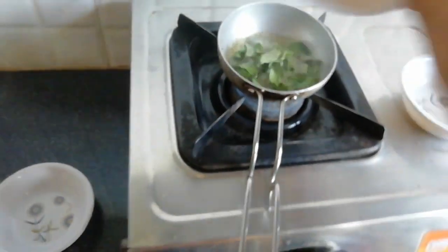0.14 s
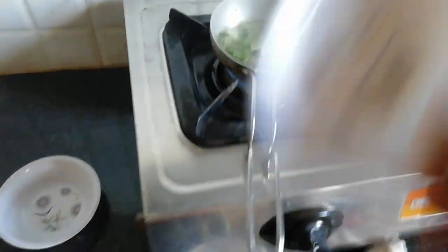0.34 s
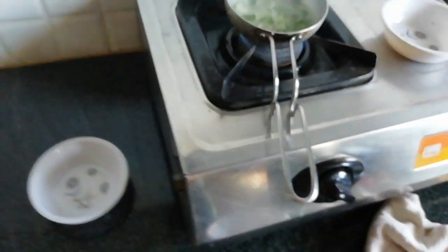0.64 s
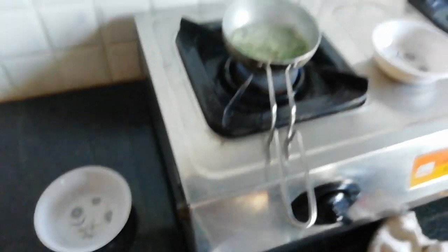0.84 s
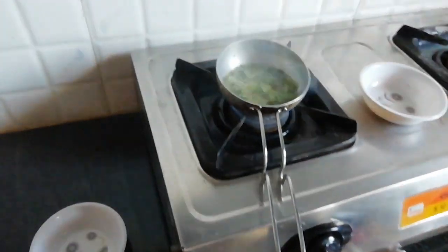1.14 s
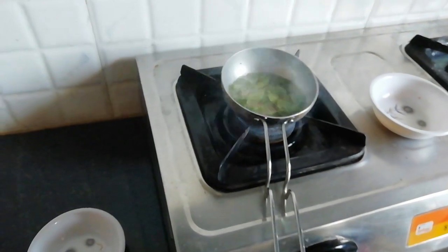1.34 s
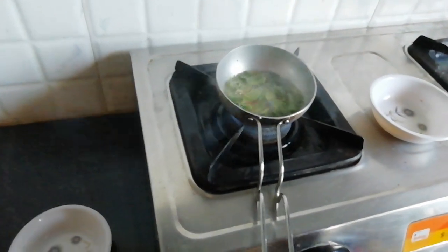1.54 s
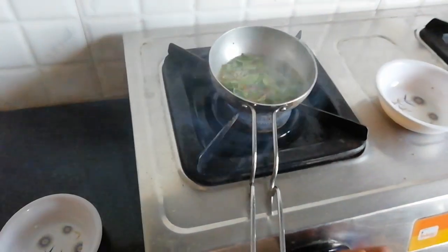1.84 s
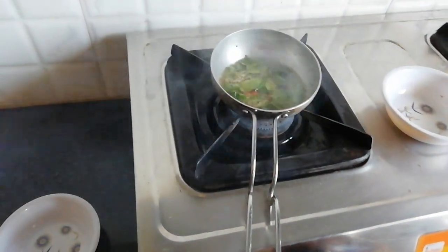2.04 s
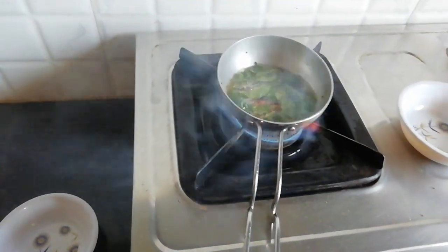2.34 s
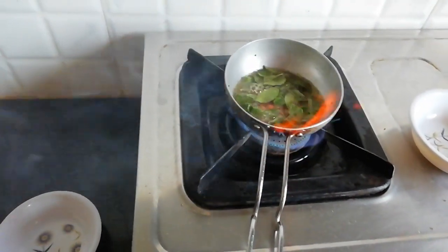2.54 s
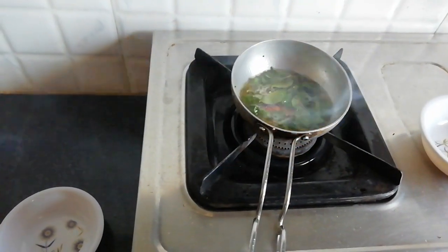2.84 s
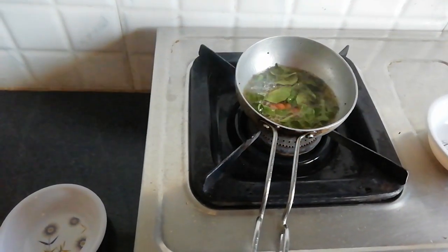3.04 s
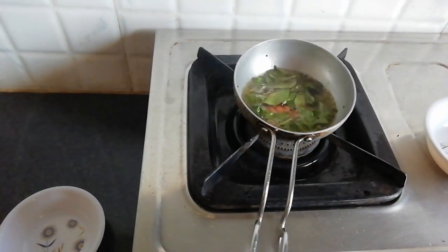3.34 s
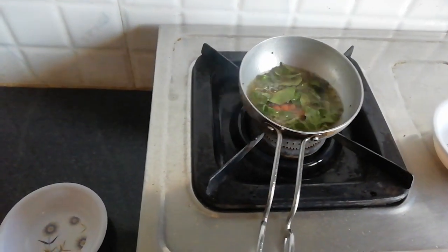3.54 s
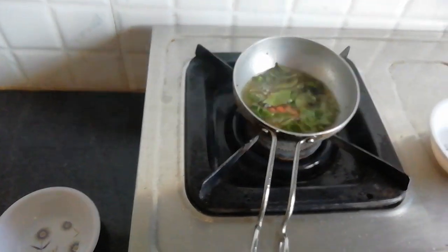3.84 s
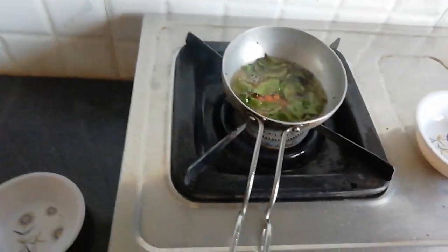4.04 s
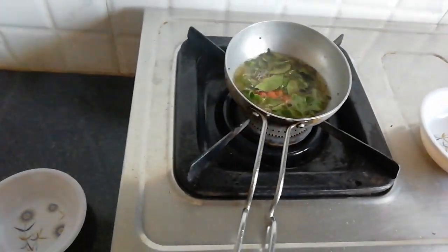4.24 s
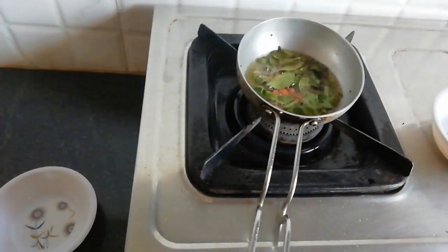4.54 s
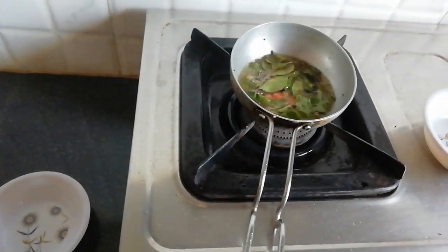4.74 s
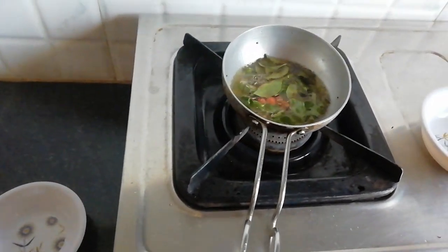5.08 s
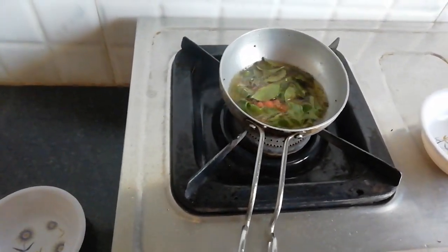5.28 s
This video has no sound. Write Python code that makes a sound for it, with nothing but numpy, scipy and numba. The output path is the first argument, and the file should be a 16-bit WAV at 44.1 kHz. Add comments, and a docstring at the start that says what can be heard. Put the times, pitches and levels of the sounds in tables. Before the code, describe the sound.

A violent rush of frying in a small metal pan, jolted by a thumping pop, gradually dries into sharp single pops and faint hiss.

```python
"""A fierce rush of frying, at once broken by a very loud pop that thumps as it overloads the microphone.
Wet leaves boil in a small steel pan of hot oil: steam bubbles, thousands of short damped sines over hiss,
thin out to single ringing, cracking pops and hollow blurps. Beneath, a gas flame flutters and puffs (shaped noise,
low damped sines) and a distant motor hums (three partials). A phone an arm's length away, its left port facing
the stove, hears it with a short tail from tiled walls."""
import sys
import numpy as np
from scipy import signal
from scipy.fft import rfft, irfft, next_fast_len
from scipy.io import wavfile
from scipy.ndimage import uniform_filter1d, minimum_filter1d
from numba import njit

SR = 44100
rng = np.random.default_rng(int(sys.argv[2]) if len(sys.argv) > 2 else 0)


def store_wav(level_fs):
    """Save 16-bit WAV to argv[1]."""
    pcm = np.round(np.clip(np.atleast_2d(level_fs), -1, 1) * 32767)
    wavfile.write(sys.argv[1], SR, pcm.T.astype(np.int16))


N = 238625


def undb(db):
    """Gain of a level in dB."""
    return 10 ** (np.asarray(db) / 20)


def unit(x):
    """Scaled to rms 1 on the first channel."""
    return x / np.sqrt(np.mean(np.atleast_2d(x)[0] ** 2))


def curves(table):
    """Columns of a table after its time column, one value per sample."""
    s, *columns = np.transpose(table)
    return [np.interp(np.arange(N) / SR, s, c) for c in columns]


def gain_at(hz, points):
    """Gain of a (Hz, dB) table, falling away steeply below its first point."""
    f, db = np.transpose(points)
    low_cut = np.minimum(hz / f[0], 1) ** 2
    return undb(np.interp(np.log(hz + 1), np.log(f), db)) * low_cut


def colour(x, points):
    """Causal (minimum-phase) filter with the gains of a (Hz, dB) table."""
    size = 4096
    ceps = irfft(np.log(gain_at(np.fft.rfftfreq(size, 1 / SR), points) + 1e-4))
    # fold the cepstrum forward in time
    ceps[1:size // 2] *= 2
    ceps[size // 2 + 1:] = 0
    impulse = irfft(np.exp(rfft(ceps)))
    return signal.fftconvolve(x, impulse)[:N]


def walk(rate_hz):
    """Random levels, a new one every 1 / rate_hz s, joined by ramps; spread near 1."""
    hold = int(SR / rate_hz)
    steps = np.repeat(rng.standard_normal(N // hold + 1), hold)
    return uniform_filter1d(steps, hold)[:N]


def split(x, edges_hz):
    """Bands of x between the edges, overlapping softly; they add up to x."""
    size = next_fast_len(x.shape[-1])
    f, spec = np.fft.rfftfreq(size, 1 / SR), rfft(x, size)
    lows = [0 * f] + [1 / (1 + (f / hz) ** 8) for hz in edges_hz] + [1 + 0 * f]
    return [irfft(spec * (b - a), size)[..., :x.shape[-1]] for a, b in zip(lows, lows[1:])]


ALIKE_HZ = 3200  # below this both ports hear the same noise


def noise_pair(count):
    """White noise for two ports: shared bass, unrelated treble."""
    low, high = split(rng.standard_normal((2, count)), [ALIKE_HZ])
    return low[0] + high


@njit
def grains(start, hz, cycles, gain, turn, rise, count):
    """Damped sines with own phases; swell and decay constants are `rise` and `cycles`, in cycles."""
    out = np.zeros(count + 4096)
    for g in range(len(start)):
        z = gain[g] * np.exp(1j * turn[g])
        unswollen = 1.
        p = np.exp((2j * np.pi - 1 / cycles[g]) * hz[g] / SR)
        q = np.exp(-hz[g] / SR / rise)
        for i in range(min(int(7 * cycles[g] * SR / hz[g]) + 1, 4000)):
            unswollen *= q
            out[start[g] + i] += z.real * (1 - unswollen)
            z *= p
    return out[:count]


def bursts(s, hz, cycles, gain, rise, spread_s):
    """Bubbles at both ports; each spot in the pan has its own path to the right port."""
    lag, turn = rng.standard_normal((len(s), 2)).T
    at = np.array([s, s + .00003 + spread_s * lag]).clip(0, (N - 1) / SR)
    cycles = cycles + 0 * hz
    return np.array([grains((a * SR).astype(int), hz, cycles, gain, 3 * turn, rise, N) for a in at])


# Share of the bubble sizes. Each row: time in s, gain of big bubbles, of middle bubbles, of fine spray, all in dB.
SIZES_DB = [(0, -5, -14, -4.5), (.1, -1.5, 3, 6.5), (.4, 0, -1.5, -5), (1.3, 2, 0.5, -2.5),
            (2.3, -0.5, 1, 0), (2.8, -4.5, 2, -9), (4.0, -1, -2.5, -10.5), (4.6, 0, -4, -6.5),
            (5.1, 7.5, 8.5, -8), (5.41, 4, -1, -6)]


def sizzle(hot_rate_hz=6000, cool_rate_hz=900, scatter_db=2.5, surge_db=1.0, steam_db=-8):
    """Dense random bubbles of all sizes over steam hiss; fewer and more uneven as the leaves dry out."""
    big_db, middle_db, fine_db = curves(SIZES_DB)
    dryness = np.linspace(0, 1, N)
    rate_hz = (hot_rate_hz * (cool_rate_hz / hot_rate_hz) ** dryness).clip(100, 20000)
    at = np.flatnonzero(rng.random(N) < rate_hz / SR)
    hz = rng.uniform(448, 16800, len(at))
    scatter = undb(scatter_db * rng.exponential(1, len(at)).clip(0, 4))
    size = scatter * np.sqrt(hz / rate_hz[at])
    bubbles = unit(bursts(at / SR, hz, 0.9, size, 0.15, .00008))
    steam = undb(steam_db - 1.4 * dryness) * noise_pair(N)
    bands = split(bubbles + steam, [2000, 3800, 8000])
    # surges, as pockets of water reach the oil, move all sizes; each size also flutters alone
    surge = surge_db * (1 + 0.23 * dryness) * walk(40) + 0.6 * walk(150)
    levels_db = (big_db, middle_db, 0, fine_db)
    return sum(b * undb(db + surge + 1.52 * walk(29.866)) for b, db in zip(bands, levels_db))


# Level of the sizzle, including the phone's gain dipping after the loud thump.
# Each row: time in s, gain in dB on the sizzle scaled to an overall rms of 1 at the left port.
SIZZLE_LEVEL_DB = [(0, -9), (.05, -17.5), (.07, -24.5), (.14, -19.5), (.3, -14.5), (.7, -14), (1.0, -16),
                   (1.2, -13.5), (1.5, -17.5), (1.7, -15), (2.1, -17.5), (2.4, -17.5), (2.8, -20.5),
                   (3.3, -25), (3.7, -30.5), (4.05, -29), (4.25, -37.5), (4.5, -32), (4.83, -39.5),
                   (4.98, -46), (5.14, -43.5), (5.41, -35)]
FIZZ_DB, FIZZ_S = -32.5, 0.017  # level behind a 0 dB row of POPS, decay constant of its power


def sizzle_gain():
    """The sizzle's level curve, plus the fizz of the oil that each listed single pop leaves behind."""
    s, db = np.transpose(POPS)[:2]
    kicks = np.zeros(N)
    kicks[(s * SR).astype(int)] = undb(db + FIZZ_DB) ** 2
    fizz_power = signal.lfilter([1], [1, -np.exp(-1 / (FIZZ_S * SR))], kicks)
    return np.sqrt(undb(curves(SIZZLE_LEVEL_DB)[0]) ** 2 + fizz_power)


# Bowl ring, clearer once the phone has drawn back. Each row: time in s, gain in dB.
BOWL_DB = [(0, -31), (.75, -28), (1.05, 1), (5.41, -11)]
BOWL_HZ, BOWL_WIDTH_HZ = 3270, 300
# Narrow port resonance near 7 kHz, stronger late as the phone tilts. Each row: time in s, gain in dB.
PORT_RING_DB = [(0, -23), (2.5, -13.5), (3.3, -2), (5.41, -4.5)]
PORT_RING_HZ, PORT_RING_WIDTH_HZ = 7030, 350


def bowl_and_port_rings(x):
    """Two narrow resonances added: the air in the pan's bowl and the microphone port."""
    out = x
    rings = ((BOWL_DB, BOWL_HZ, BOWL_WIDTH_HZ), (PORT_RING_DB, PORT_RING_HZ, PORT_RING_WIDTH_HZ))
    for table, hz, width_hz in rings:
        ring = signal.lfilter(*signal.iirpeak(hz, hz / width_hz, SR), x)
        out = out + undb(curves(table)[0]) * ring
    return out


def kitchen(x, early_db, late_db, early_t60_s=0.018, late_t60_s=0.13):
    """Close reflections, then the walls: decaying noise, different at each port, even in colour."""
    t = np.arange(SR // 2) / SR
    fall = 0
    for db, t60_s in ((early_db, early_t60_s), (late_db, late_t60_s)):
        fall = fall + undb(db)[:, None] * unit(undb(-60 * t / t60_s))
    echo = fall * noise_pair(len(t)) / np.sqrt(len(t)) * (t > .001)
    echo[:, 0] = 1  # direct sound
    spec = rfft(echo)
    power = np.abs(spec) ** 2
    spec *= np.sqrt(power.mean(axis=1, keepdims=True) / uniform_filter1d(power, size=150))
    # levelling smears a little ahead of the direct sound: shift it in, then back out
    echo = np.roll(irfft(spec), 128, axis=1)
    return signal.fftconvolve(x, echo, axes=1)[:, 128:N + 128]


# Pan and microphone port together. Each row: frequency in Hz, gain in dB.
LEFT_PORT_DB = [(500, -48.5), (700, -28.5), (850, -18.5), (1200, -18.5), (1800, -11), (2600, -5.5),
                (3250, -3.5), (4100, -7.5), (5200, -2), (6400, 2.44), (7100, -1.5), (7900, -15),
                (9200, -16), (12500, -19), (14700, -14)]
# The same for the right port. Each row: frequency in Hz, gain in dB.
RIGHT_PORT_DB = [(500, -43), (750, -30.5), (1200, -21), (1800, -17.5), (2600, -21), (3250, -16.5),
                 (4100, -22), (5000, -15.5), (7400, -19), (8500, -9.5), (10000, -12.5), (11000, -18),
                 (13200, -17.5), (14700, -19)]


def ports(x):
    """Colour of pan and microphone at each port."""
    return np.array([colour(x[0], LEFT_PORT_DB), colour(x[1], RIGHT_PORT_DB)])


# Flame flutter. Each row: time in s, noise gain in dB.
FLAME_DB = [(0, -61), (1.9, -62.5), (2.38, -62.5), (2.45, -56.5), (2.8, -65), (4, -63.5), (5.41, -65.5)]
# Colour of the noise shared by both ports. Each row: frequency in Hz, gain in dB.
FLAME_COLOUR_DB = [(20, -4), (50, 6), (120, 2.5), (250, 0.5), (400, -4), (700, -10), (2000, -20)]
# Low flame puffs, and one short low tick at 3.369 s.
# Each row: start in s, level in dB before swell and decay, pitch in Hz.
PUFFS_AND_TICK = [(1.451, -42, 60), (2.42, -33.5, 109), (2.492, -33, 152), (3.369, -44, 450)]


def flame(side_db=-6):
    """Low fluttering noise, partly opposite at the two ports; puffs and a tick as short damped sines."""
    mid = colour(rng.standard_normal(N), FLAME_COLOUR_DB)
    side_colour = [(60, -10.5), (300, -9.5), (450, side_db), (700, -8), (2000, -32)]  # Hz, dB
    side = colour(rng.standard_normal(N), side_colour)
    noise = (mid + side * np.array([[1], [-1]])) / np.sqrt(250 / (SR / 2))
    flutter_db = 1.5 * walk(15)
    s, db, hz = np.transpose(PUFFS_AND_TICK)
    puffs_and_tick = grains((s * SR).astype(int), hz, 1.1 + 0 * s, undb(db), 0 * s - np.pi / 2, 0.25, N)
    return noise * undb(curves(FLAME_DB)[0] + flutter_db) + puffs_and_tick


# Motor. Each row: time in s, rms of first partial, of second partial, both in dB before wavering.
HUM_DB = [(0.1, -67, -66.5), (1.3, -66, -67), (1.9, -64, -61), (2.46, -57.5, -49), (2.9, -62.5, -55),
          (3.5, -60, -57.5), (4.0, -57, -56), (4.9, -50.5, -59), (5.41, -56, -59.5)]
# Motor pitch. Each row: time in s, first partial in Hz before wavering.
HUM_HZ = [(0, 91.5), (1.9, 91), (2.5, 90), (3.5, 87.5), (4.0, 84.5), (4.9, 84.3), (5.41, 85)]
THIRD_DB = -14.5  # third partial relative to the second


def hum(waver_db=3.5):
    """Three harmonic partials of a far motor, wavering together in pitch and separately in level."""
    first_db, second_db = curves(HUM_DB)
    hz = curves(HUM_HZ)[0] * (1 + 0.013 * walk(15))
    phase = 2 * np.pi * np.cumsum(hz) / SR
    partials_db = (first_db, second_db, second_db + THIRD_DB)
    waves = (undb(db + waver_db * walk(12)) * np.sin(k * phase) for k, db in enumerate(partials_db, 1))
    return np.sqrt(2) * sum(waves)


SMALL_RATE_HZ, SMALL_THINNING = 30, 1.5  # mean rate; thinning above 1 crowds them early
SMALL_DB, SMALL_SCATTER_DB, SMALL_FADE_DB = -14, 3, -14  # base level, scatter, fall as the leaves dry
SMALL_LOW_HZ, SMALL_HIGH_HZ, SMALL_CRACK_DB = 2710, 7300, -20  # crack is relative to the ring level


def small_pops():
    """Rows like those of POPS for the many lesser pops, at random times and pitches."""
    when, pitch, size = rng.random((int(SMALL_RATE_HZ * N / SR), 3)).T
    when = when ** SMALL_THINNING
    db = SMALL_DB + SMALL_FADE_DB * when - SMALL_SCATTER_DB * np.log(size.clip(.1, 1))
    hz = SMALL_LOW_HZ + (SMALL_HIGH_HZ - SMALL_LOW_HZ) * pitch
    return np.transpose([when * (N / SR - .01), db, hz, db + SMALL_CRACK_DB])


# Single pops. Each row: start in s, ring level in dB before ring_db, bubble pitch in Hz,
# crack level in dB before crack_db.
POPS = [(0.0434, 8, 7200, -37), (0.0527, 4, 7050, -37), (0.1044, -11, 3060, -21), (0.2316, 12, 6450, -14),
        (0.2401, 3, 6840, -28), (0.2601, 5, 6360, -31), (0.3075, 17, 6240, -31), (0.513, -3, 3460, -19.5),
        (0.5744, -1, 6000, -3), (0.9535, 10, 6870, -23), (0.9859, 0.5, 3380, -38), (1.417, -1, 6600, -28),
        (1.472, -10, 3430, -20), (1.523, -13, 3330, -23), (1.609, -14, 3280, -17), (1.694, -13, 6400, -9),
        (1.7637, -4, 3400, -45), (1.8101, 11.5, 6400, -21), (1.8754, 4, 6230, -23),
        (1.9986, -3.5, 3150, -22), (2.067, -1, 6030, -5), (2.1568, 3, 3270, -12), (2.1962, -14, 6200, -6.5),
        (2.271, -3, 3150, -35), (2.3658, -4, 3270, -31), (2.5258, -1, 6130, -30), (2.5846, -5, 3200, -39),
        (2.6076, -5, 3110, -42), (2.6295, -1.5, 3210, -30), (2.6475, -6, 3235, -33),
        (2.6844, -1.5, 3240, -38), (2.7059, -8, 3280, -34), (2.7483, -5, 3280, -32), (2.7747, 4, 3100, -19),
        (2.7982, -4, 6260, -16.5), (2.8096, -3, 3100, -39), (2.8525, 1, 5900, -40), (2.87, -2.5, 5710, -37),
        (2.9064, -4.5, 3420, -34), (2.9373, 2, 2980, -53), (3.0117, 1, 6540, -18), (3.0375, -9, 6670, -19),
        (3.0795, -5, 6000, -17.5), (3.099, -5.5, 3200, -36), (3.1533, 0, 7000, -41),
        (3.1712, -9, 3330, -26), (3.198, -10, 3600, -40), (3.2067, -3, 7000, -45), (3.2127, 0, 7000, -33),
        (3.2257, -5, 3370, -40), (3.2327, 2.5, 6700, -34), (3.2766, -1, 7250, -41), (3.2875, 0, 4200, -28),
        (3.3085, -0.5, 7020, -43), (3.328, -10, 6800, -25.5), (3.3354, -3.5, 3220, -31.5),
        (3.3689, 2, 7200, -16), (3.38, -9, 3100, -40), (3.399, -10, 6500, -23.5), (3.436, -10, 4060, -43),
        (3.4544, -7, 6800, -28), (3.4646, -11, 7100, -16), (3.5175, -0.5, 6320, -35),
        (3.5195, -6.5, 3600, -40), (3.5624, -7.5, 3300, -34), (3.575, -10, 6940, -22.5),
        (3.585, -10, 3140, -33), (3.6098, -4.5, 6700, -45), (3.6442, -9, 7080, -40),
        (3.6656, -8, 6600, -40), (3.6906, -1, 6960, -34), (3.7171, -8, 6800, -39), (3.737, -2, 6940, -36),
        (3.7405, -9.5, 3240, -36), (3.7989, 0, 6330, -17.5), (3.8248, -3.5, 3430, -25),
        (3.8488, -1, 7100, -23.5), (3.8597, -4.5, 3350, -37), (3.8872, -12, 3240, -39),
        (3.8982, -5.5, 7060, -54), (3.9346, -2.5, 3320, -27), (3.944, -4.5, 3340, -37),
        (3.969, 3, 7000, -16), (3.986, -6.5, 3320, -40), (4.004, -5, 7170, -21), (4.0119, -0.5, 4300, -29),
        (4.0433, -3.5, 3760, -41), (4.0638, -9, 6960, -53), (4.0917, -4, 3220, -28),
        (4.1331, -3.5, 6700, -49), (4.1491, -3, 3870, -43), (4.2005, -6.5, 7400, -26),
        (4.2469, -15, 6800, -33), (4.2748, -4.5, 6490, -22), (4.3157, -12, 7220, -27.5),
        (4.3357, -19, 6380, -30), (4.358, -8, 6600, -23), (4.3632, 3.5, 6960, -26),
        (4.4145, -10.5, 6990, -47), (4.4474, -4, 6800, -48), (4.4659, -1, 6790, -26.5),
        (4.4868, -8, 6010, -49), (4.5207, -15, 6300, -49), (4.5547, -10, 6030, -38),
        (4.604, -23, 3860, -23.5), (4.6465, -12.5, 2270, -24), (4.6784, 3, 6590, -10.5),
        (4.7138, 0.5, 3030, -28), (4.7587, -12, 6900, -37.5), (4.7764, -20, 6500, -34),
        (4.7976, -15.5, 7030, -45), (4.8739, -2, 6750, -35), (4.8984, -13.5, 3200, -28),
        (4.9123, -6.5, 3040, -53), (4.9428, -17, 2870, -48), (4.9682, -14, 2760, -32),
        (4.9862, -7, 7000, -43), (5.0026, -9, 6300, -35), (5.0625, -10, 2970, -38), (5.095, -23, 6580, -34),
        (5.1074, -18, 7040, -47), (5.1603, -24, 3000, -43), (5.1837, -5, 2340, -39), (5.1982, 1, 6900, -19),
        (5.2401, -1, 6800, -37), (5.2683, -4, 7030, -7.5), (5.2688, 1.5, 3210, -40),
        (5.288, -7.5, 3000, -41), (5.3553, -8, 3190, -36)]


def pops(ring_db=8, crack_db=6, crack_s=0.00051, swell_s=.0007, spray_s=.012, spray_db=-24, count=14):
    """Each pop is a ringing bubble, a thin crack as its skin tears, and a spray of droplets falling back."""
    s, db, hz, top_db = np.vstack([POPS, small_pops()]).T
    ring_gain = undb(db + ring_db) / gain_at(hz, LEFT_PORT_DB)  # offsets the port's colour
    ring = bursts(s + swell_s, hz, 1.97, ring_gain, 2.35, .00005)
    tear = np.zeros(N)
    tear[((s + swell_s) * SR).astype(int)] = undb(top_db + crack_db) / gain_at(10780, RIGHT_PORT_DB)
    tear = signal.lfilter([1], [1, -np.exp(-1 / (crack_s * SR))], tear)
    crack = split(tear * rng.standard_normal((2, N)), [3000])[1]
    # droplets land later and weaker, at pitches scattered round the pop's own
    late_s = rng.exponential(spray_s, (len(s), count))
    drop_hz = (hz[:, None] * np.exp(0.21 * rng.standard_normal(late_s.shape))).clip(1000, 15000)
    drop_gain = (ring_gain * undb(spray_db))[:, None] * np.exp(-late_s / (3 * spray_s))
    drop_at_s = s[:, None] + 0.0022 + late_s
    spray = bursts(drop_at_s.ravel(), drop_hz.ravel(), 2.16, drop_gain.ravel(), 0.47, .0001)
    return ring + spray + crack


# Overload at each port, left then right. Each row: sharp tip level in dB, rise constant in s,
# tip fall constant in s, body level in dB.
OVERLOAD = [(-8, 0.000063, 0.00037, -14.5), (-30, .0002, .0006, -13)]
OVERLOAD_S, OVERLOAD_LAG_S, OVERLOAD_BODY_S = .0539, 0.00065, 0.0024


def overload_thump():
    """The very loud pop overloads the microphone: a one-sided low thump, later and rounder at the right port."""
    tip_db, rise_s, fall_s, body_db = np.transpose(OVERLOAD)[:, :, None]
    starts_s = np.array([[OVERLOAD_S], [OVERLOAD_S + OVERLOAD_LAG_S]])
    t = (np.arange(N) / SR - starts_s).clip(0)
    undershoot = 0.057 * (1 - np.exp(-t / 0.0063)) * np.exp(-t / 0.096)
    body = np.exp(-t / OVERLOAD_BODY_S) - undershoot
    tip = undb(tip_db) * np.exp(-t / fall_s)
    return (1 - np.exp(-t / rise_s)) * (tip + undb(body_db) * body)


# Big wet bubbles bursting. Each row: start in s, level in dB before ring_db and part level, base pitch in Hz.
BLURPS = [(.242, -28.5, 1320), (.515, -27, 1200), (.706, -23, 1300), (.752, -19.5, 1180), (2.49, -30, 1850),
          (3.097, -51, 1180), (3.17, -32.5, 1620), (3.278, -27, 1740), (3.369, -23, 2300),
          (3.549, -22, 1940), (3.741, -27, 1640), (3.941, -26, 1900), (4.15, -32, 1670),
          (4.3697, -17.5, 1580), (4.42, -37, 1270), (4.524, -36.5, 1040), (4.538, -26, 1970),
          (4.646, -44, 1860), (5.062, -37, 1874), (5.185, -22, 1170)]


def blurps(ring_db=4):
    """Hollow low bursts: the bubble, the slower slosh of its crater and the higher collapsing neck."""
    s, db, hz = np.transpose(BLURPS)
    out = 0
    for ratio, part_db in ((.75, -16), (1, 3), (1.5, -1)):
        gain = undb(db + ring_db + part_db) / gain_at(ratio * hz, LEFT_PORT_DB)
        out = out + bursts(s, ratio * hz, 1.35, gain, 0.061, .00002)
    return out


def scene():
    """The pan in the kitchen, over flame and hum."""
    fry = ports(kitchen(bowl_and_port_rings(sizzle()), [-8, -3], [-10, -5]))
    fry = unit(fry) * sizzle_gain()
    popping = kitchen(bowl_and_port_rings(pops()), [-7, -3], [-12, -7])
    blurping = kitchen(blurps(), [-4, -4], [-10, -9], early_t60_s=0.13)
    return fry + ports(popping + blurping) + hum() + flame() + overload_thump()


TOP_HZ = 15900


def record(dry):
    """The phone's limiter holds the loudest peaks, both ports alike; the top is cut."""
    gain = 1 / np.maximum(np.abs(dry).max(axis=0), 1)
    gain = uniform_filter1d(minimum_filter1d(gain, size=129), size=65)
    top_cut = signal.ellip(12, .2, 90, TOP_HZ, fs=SR, output="sos")
    return signal.sosfilt(top_cut, dry * gain).clip(-1, 1)


dry = scene()
out = record(dry)
store_wav(out)
```